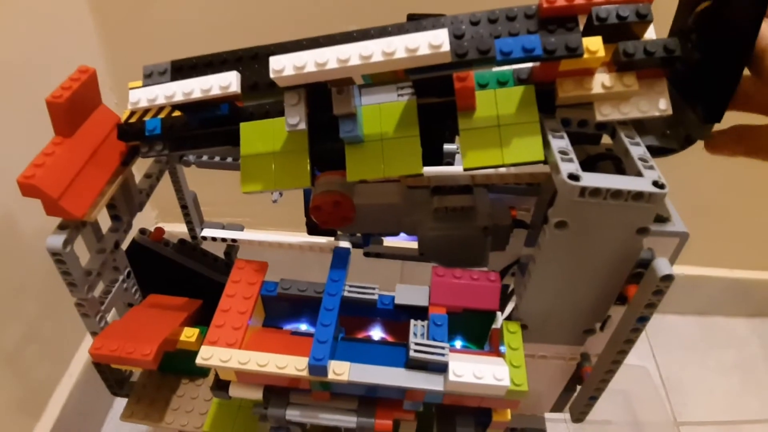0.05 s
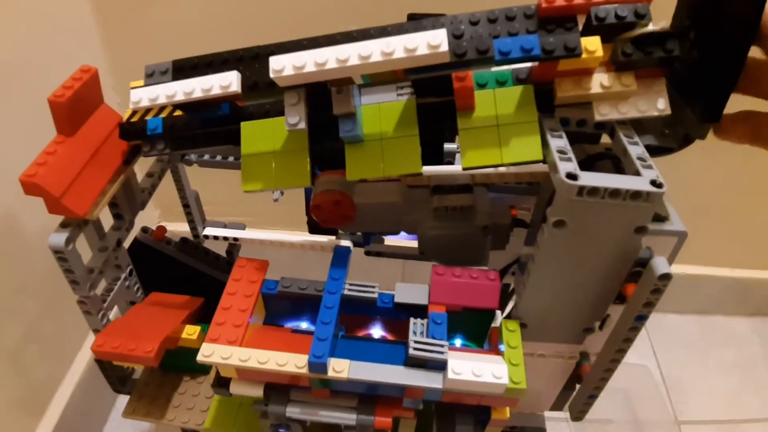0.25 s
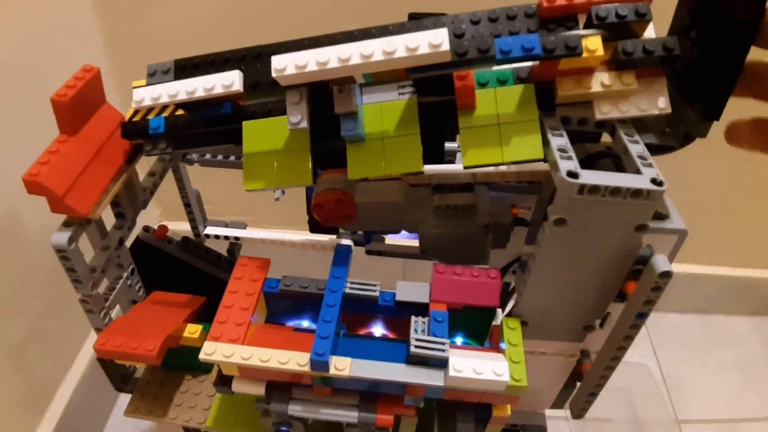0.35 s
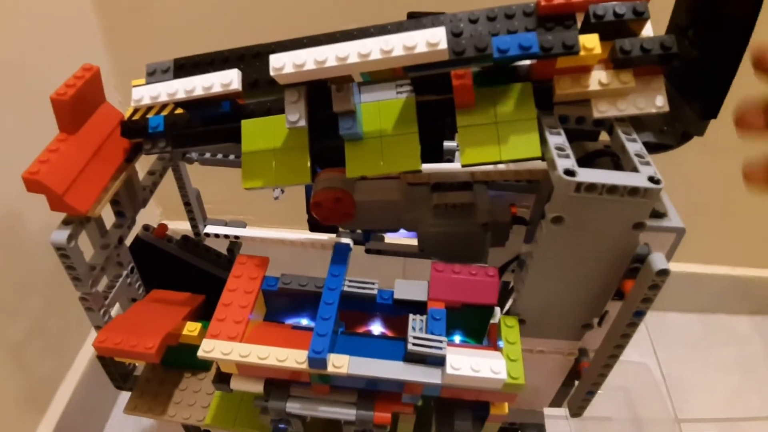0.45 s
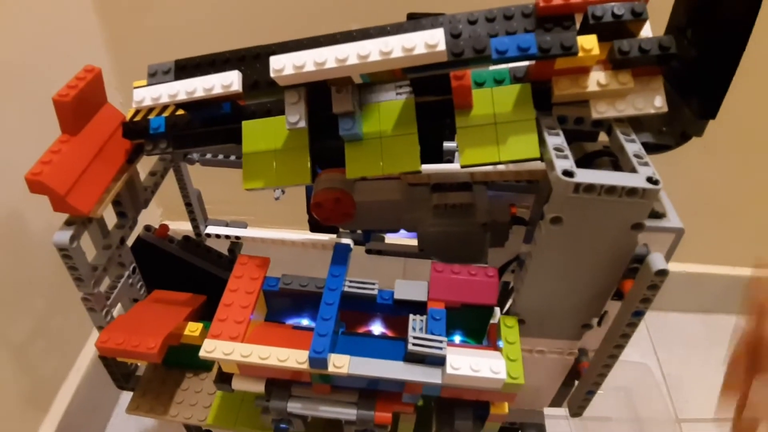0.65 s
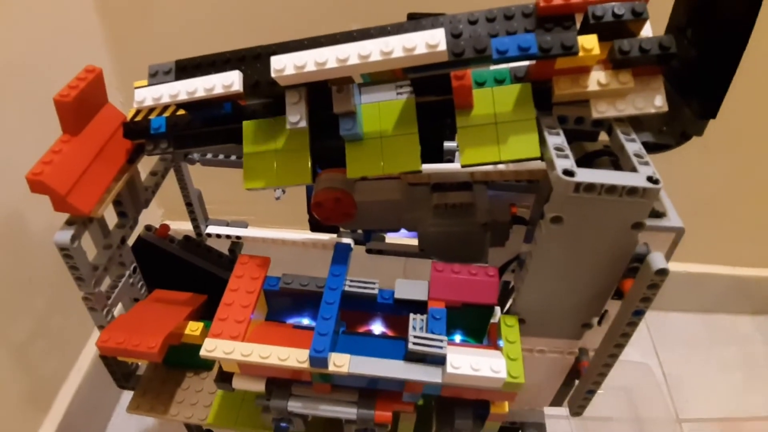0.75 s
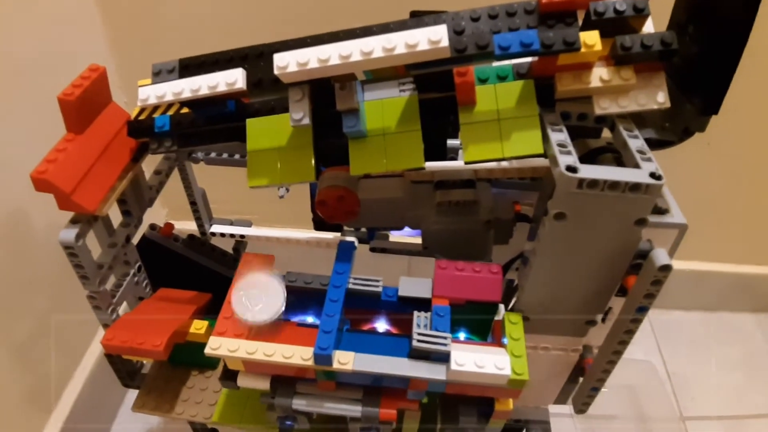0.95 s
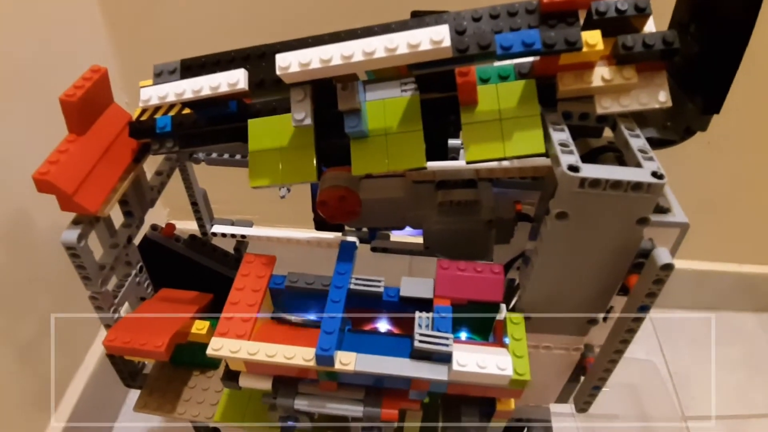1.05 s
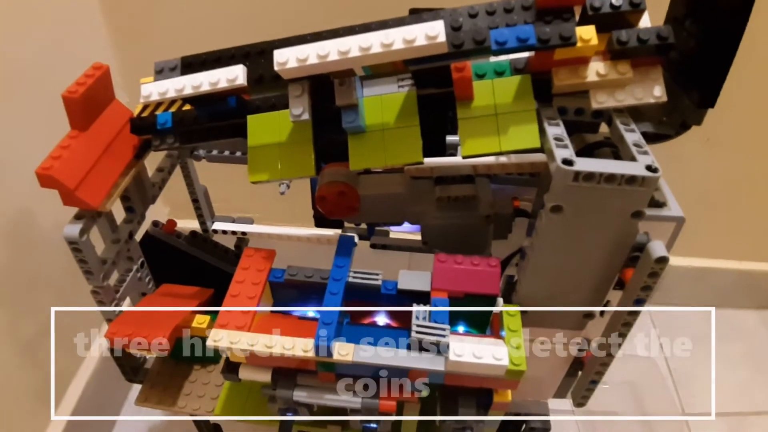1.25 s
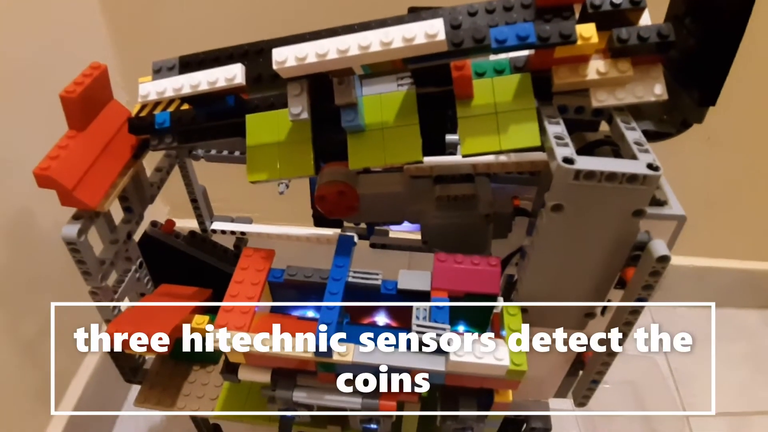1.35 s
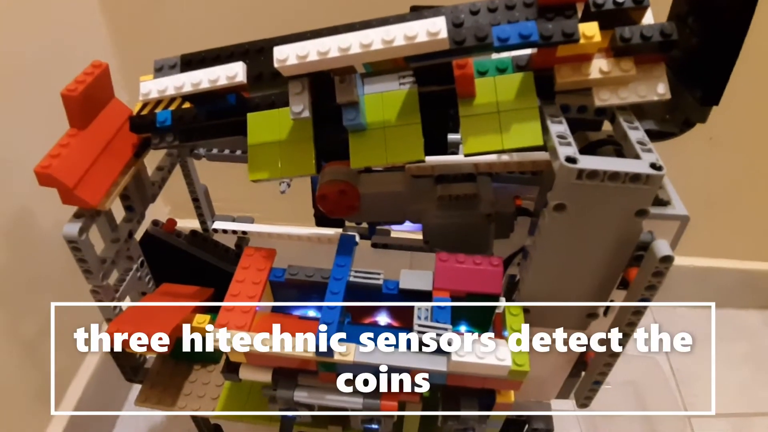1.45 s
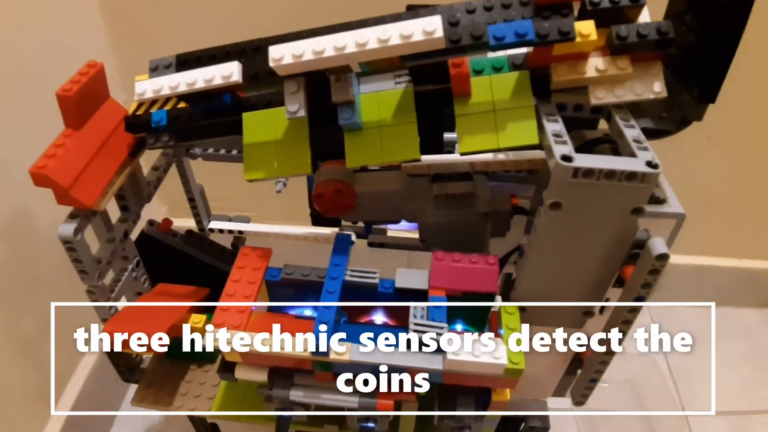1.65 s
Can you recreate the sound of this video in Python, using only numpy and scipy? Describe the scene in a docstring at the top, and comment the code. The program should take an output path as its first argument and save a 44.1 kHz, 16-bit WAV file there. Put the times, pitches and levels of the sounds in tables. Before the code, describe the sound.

Sharp clicks and scrapes of a coin tumbling through a sorting machine of plastic bricks.

```python
"""A coin clatters through a sorter built of plastic bricks, in a small hard room.
It drops onto a ramp, rolls and scrapes down it, knocks through a gate and lands in a tray.
Impacts excite damped modes of coin and plastic; friction makes a grinding noise and a thin squeal.
A loose part stirs as the coin enters; after the landing it rocks, rattling at every swing.
Rolling and rattling force the frame and the hollow chassis to vibrate, over a faint background noise."""
import sys
import numpy as np
from scipy import signal
from scipy.io import wavfile

SR = 44100
rng = np.random.default_rng(int(sys.argv[2]) if len(sys.argv) > 2 else 0)


def put_to_file(sound):
    """Save the sound as 16-bit audio at rate SR, in the file named by the first command-line argument."""
    columns = np.atleast_2d(sound).T  # one column per channel
    safe = np.clip(columns, -1, 1)
    whole_steps = np.round(safe * 32767)
    wavfile.write(sys.argv[1], SR, whole_steps.astype(np.int16))


N = 74970
T = np.arange(N) / SR

# Impacts of the coin on plastic: (time [s], level [dB], bass boost [dB], resonance of the piece [Hz],
# resonance boost [dB], T60 at 4 kHz [s], coin ring [dB], left minus right [dB])
IMPACTS = [(0.2159, -16, -20, 5430, 13, 0.041, 3, 3), (0.2226, -11, -8, 1460, 8.5, 0.054, -1, -3.5),
           (0.2356, -30, 0, 660, 27, 0.055, 25, -8), (0.2461, -8.5, -11, 5530, -9, 0.033, -1, 3),
           (.269, -24, -27, 5560, 14.5, 0.025, -6, -7), (0.4464, -11.5, -7.5, 6440, 6.5, 0.031, -6, 0),
           (0.6091, -12.5, -29, 3530, 3, 0.041, -1.5, 0.5), (.7795, -7, 3.5, 1270, 3.5, 0.042, -20, 2.5),
           (0.834, -14.5, -17, 4300, 1.5, 0.12, 11.5, 0), (0.864, -14.5, -35, 4320, 4.5, 0.092, -12, 0.5),
           (0.9494, -8, -13.5, 770, 16, 0.037, -1, -0.5), (0.9679, -17.5, 7.5, 4850, 3, 0.032, -12, -7.5),
           (0.9744, -8.5, -12, 4640, 6.5, 0.026, 0, 2.5), (1.067, -20, -14, 8700, 11.5, 0.078, 11.5, 1),
           (1.1386, -6, 8, 2180, -0.5, 0.041, -4, 1.5)]
# Light ticks: the first two as the coin is still handled before the drop, the rest as the rolling coin crosses
# seams between bricks: (time [s], level [dB])
TICKS = [(0.0589, -41), (0.0837, -39), (0.29, -19.5), (0.31, -34), (0.348, -30), (0.499, -24.5),
         (0.516, -26), (0.5483, -24), (.5855, -32), (0.656, -23), (0.6989, -23.5), (0.815, -19.5),
         (1.059, -20.5), (1.085, -24), (1.105, -22.5), (1.167, -22)]
def knocks():
    """Impact excitation: each contact starts a broadband decay and free modes. Gives (clacks, ringing)."""
    s, db, bass_db, piece_hz, piece_db, t60, coin_db, pan_db = np.transpose(IMPACTS)
    tick_s, tick_db = np.transpose(TICKS)
    age = T - s[:, None]
    loss = np.where(age >= 0, np.log(1000) * age / t60[:, None], 1e3)

    def envelope(hz):
        bass = 1 / (1 + (hz / 780) ** 2)
        resonance = np.exp(-.5 * (np.log2(hz / piece_hz) / .25) ** 2)
        gains = from_db(db + bass_db * bass + piece_db * resonance) * pan(pan_db)
        longer = (4000 / hz) ** .18  # low bands ring longer
        ticks = fade(clicks(tick_s, from_db(tick_db + bass)), t60=.042 * longer)
        return gains @ np.exp(-np.minimum(loss / longer, 20)) + ticks
    on_ramp = s < .3
    later = ~on_ramp
    ringing = ramp(s[on_ramp], db[on_ramp])
    ringing += coin(np.r_[s, tick_s], np.r_[db + coin_db, tick_db - 8])
    ringing += chassis_knock(s[later], (db + bass_db / 2)[later])
    return clacks(envelope) + cracks(s[later], db[later], pan_db[later]), ringing


# Spectrum of struck plastic: (frequency [Hz], spectral density [dB])
CLACK_SPECTRUM = [(40, -34), (130, -27), (300, -23.5), (500, -23.5), (800, -12.5), (1200, -2.5), (2500, 1),
                  (4500, 5), (7000, 1), (8700, -23.5), (11000, -9.5), (15500, -11.5)]
def clacks(envelope):
    """Modal overlap: the crowded modes of struck plastic merge into noise."""
    return band_noise(CLACK_SPECTRUM, envelope)


def cracks(s, db, pan_db):
    """Time-bandwidth reciprocity: a brief contact gives a broad, dry snap."""
    bursts = np.array([fade(clicks(s, gains), t60=.0039) for gains in from_db(db - 1) * pan(pan_db)])
    return bandpass(bursts * rng.standard_normal((2, N)), hz=(1400, 6300))


# Modes of the coin: (frequency [Hz], level [dB], T60 [s])
COIN_MODES = [(9080, -15, 0.21), (9180, -10.5, 0.26), (15475, -2.5, 0.086)]
COIN_PAN_DB = 8
def coin(s, db):
    """Plate vibration: a small, stiff metal disc rings at a few high frequencies."""
    return struck(s, db - 17.5, COIN_MODES) * pan(COIN_PAN_DB)


# Rolling and scraping: (start [s], duration [s], level [dB], treble boost [dB], squeal [dB], drone [dB])
SLIDING_CONTACTS = [(0.076, 0.13, -50, -16, -40, -19), (0.2065, 0.022, -24.5, 14, -24, -36),
                    (0.239, 0.1314, -33, -7, -37, -15), (0.375, 0.091, -39.5, 2.5, -23, 5),
                    (0.474, 0.12, -33.5, -5, -37, -3), (0.605, 0.11, -30, -7, -29, 7.5),
                    (0.709, 0.096, -37, 1.5, -23, -2), (0.835, 0.03, -25.5, 21, 7, -25),
                    (0.95, 0.1, -38, -5, -10, 11.5), (1.147, 0.078, -31, 7.5, -25, -10)]
# Spectrum of friction: (frequency [Hz], spectral density [dB])
FRICTION_SPECTRUM = [(60, -37), (500, -11), (1100, -1), (2500, 6), (5000, 7), (7000, -0.5), (8700, -22),
                     (11000, -11.5), (15500, -20)]
def slides():
    """Friction: the coin's edge grinds on plastic and pumps its highest mode. Gives (grind, squeal)."""
    s, length, db, treble_db, squeal_db, drone_db = np.transpose(SLIDING_CONTACTS)[:, :, None]
    edge_s, squeal_hz, squeal_t60 = .0065, 15475, .068
    gates = np.clip(np.minimum(T - s, s + length - T) / edge_s + .5, 0, 1)

    def level(extra_db):
        return np.sum(gates * from_db(db + extra_db), axis=0)
    rough = grain(spread_db=3.5)
    grind = band_noise(FRICTION_SPECTRUM, lambda hz: rough * level(treble_db / (1 + (7700 / hz) ** 6)))
    pumped = fade(level(squeal_db), squeal_t60) * np.log(1000) / (squeal_t60 * SR)
    squeal = pumped * np.sin(2 * np.pi * squeal_hz * T + .6 * wander() + [[0], [2]])
    return grind + chassis_drone(level(drone_db)), squeal * pan(COIN_PAN_DB)


# Modes of the ramp: (frequency [Hz], level [dB], T60 [s])
RAMP_MODES = [(618, -20.5, 0.19), (1463, -9, 0.15), (2634, -16.5, 0.63), (3480, -5.5, 0.34),
              (3505, -3, 0.2), (5370, -14, 0.36), (5523, -0.5, 0.22), (5615, 8.5, 0.064), (5620, -14, 0.32)]
def ramp(s, db):
    """Free vibration: the struck ramp rings on at its natural frequencies."""
    return struck(s, db - 9.5, RAMP_MODES) * pan(db=4)


# Modes of the tray: (frequency [Hz], level [dB], T60 [s])
TRAY_MODES = [(73.6, -22, 0.096), (148, -10.5, 0.031), (1044, -3.5, 0.28), (1442, -10.5, 0.37),
              (2120, 0.5, 0.15)]
LANDING_S = 1.139
def tray():
    """Impulse response: at the landing, the tray's low modes thump and its high ones ring."""
    return struck([LANDING_S], [-23.5], TRAY_MODES)


# Swings of the loose part: (peak time [s], level [dB], half width [s])
ROCKING_SWINGS = [(0.119, -51, 0.017), (0.169, -40.5, 0.013), (1.211, -22.5, 0.0083), (1.314, -28.5, 0.013),
                  (1.402, -27, 0.0081), (1.483, -32, 0.012), (1.559, -33, 0.014), (1.63, -29, 0.01),
                  (1.698, -31, 0.015)]
# Spectrum of its rattle: (frequency [Hz], spectral density [dB])
RATTLE_SPECTRUM = [(200, -40), (600, -21.5), (1100, 0.5), (2200, 3.5), (4500, 2), (6500, -5), (8700, -21),
                   (11000, -16), (15500, -25)]
def rocking():
    """Amplitude modulation: the loose part's rattle swells and fades with every swing."""
    s, db, width = np.transpose(ROCKING_SWINGS)[:, :, None]
    swell = np.sum(from_db(db) / (1 + ((T - s) / width) ** 2 / 2) ** 2, axis=0)
    swell += from_db(-54.5) * (T > LANDING_S)  # a faint rattle persists between swings
    drive = swell * grain(spread_db=1.5)
    rattle = band_noise(RATTLE_SPECTRUM, lambda hz: drive) * pan(db=.9)
    return rattle + chassis_drone(from_db(-10.5) * swell)


# Modes of the hollow chassis: (frequency [Hz], level [dB], T60 [s])
CHASSIS_MODES = [(294.7, -5.5, 0.26), (359.3, -11, 0.33), (426, -7, 0.24)]
def chassis_knock(s, db):
    """Transient response: blows set the low modes of the chassis ringing."""
    return struck(s, db - 34, CHASSIS_MODES)


def chassis_drone(level):
    """Forced vibration: rolling and rattling shake the same modes at random."""
    return from_db(-53) * resonate(level * rng.standard_normal(N), CHASSIS_MODES)


# Modes of the brick frame: (frequency [Hz], level [dB], T60 [s])
FRAME_MODES = [(1035, -13.5, 1), (1120, -7, 1), (1902, -3, 0.24), (2220, -6, 0.25), (2710, -5, 0.12)]
def frame(x):
    """Sympathetic resonance: the frame sings; its loose joints favour now one mode, now another."""
    drive = from_db(-46) * x.mean(axis=0)
    return sum(resonate(drive * grain(spread_db=4, per_s=12), [mode]) for mode in FRAME_MODES)


# Reverberation time of the room: (frequency [Hz], T60 [s])
REVERB_TIMES = [(150, 0.22), (1200, 0.36), (4000, 0.2), (12000, 0.21)]
def room(x):
    """Reverberation: a diffuse field follows after 6 ms and lasts longest in the midrange."""
    flat = [(30, 0), (16000, 0)]
    tail = band_noise(flat, lambda hz: (T > .006) * from_db(-60 * T / at_hz(REVERB_TIMES, hz)))
    tail /= np.sqrt(np.sum(tail ** 2, axis=1, keepdims=True))
    return from_db(-8.5) * signal.fftconvolve(x, tail, axes=1)[:, :N]


# Spectrum of the background: (frequency [Hz], spectral density [dB])
BACKGROUND_SPECTRUM = [(30, -14), (60, 9), (110, 14.5), (200, -8), (1000, 4), (4000, -3), (15500, -10)]
def background():
    """Stationary noise: a faint, even hiss and rumble."""
    return from_db(-71) * band_noise(BACKGROUND_SPECTRUM, lambda hz: 1)


# Likeness of the sound at the two ears: (frequency [Hz], correlation [1])
EAR_CORRELATION = [(100, 0.4), (300, 0.86), (1000, 0.44), (2500, 0.1), (10000, 0.044)]
def correlation(hz):
    """Interaural coherence: the ears agree most in the low midrange, least in the treble."""
    return np.clip(at_hz(EAR_CORRELATION, hz), -1, 1)


def struck(s, db, modes):
    """Damped free vibration: each blow adds energy to the modes and gives them a new phase."""
    energy, out = clicks(s, from_db(db) ** 2), 0
    for hz, mode_db, t60 in modes:
        phase = np.cumsum(clicks(s, rng.uniform(0, 2 * np.pi, len(s))))
        phase = phase + np.array([[0], [1]]) * np.arccos(correlation(hz))
        amplitude = from_db(mode_db) * np.sqrt(fade(energy, t60 / 2))
        out = out + amplitude * np.sin(2 * np.pi * hz * T + phase)
    return out


def resonate(x, modes):
    """Driven resonance: each mode filters the force and reaches each ear with its own phase."""
    out = 0
    for hz, db, t60 in modes:
        pole = from_db(-60 / (t60 * SR)) * np.exp(2j * np.pi * hz / SR)
        phase = np.array([[1], [-1]]) * np.arccos(correlation(hz)) / 2
        response = signal.lfilter([1], [1, -pole], x + 1e-18)
        out = out + from_db(db) * np.imag(response * np.exp(1j * phase))
    return out


def band_noise(spectrum, envelope):
    """Superposition: stereo noise bands, each shaped in time by envelope(hz)."""
    edges = np.r_[25, 55, 90, 150, 250, 400, 580, np.geomspace(780, 16500, 20)]
    centres = np.sqrt(edges[1:] * edges[:-1])
    gains = from_db(at_hz(spectrum, centres))
    gains /= np.sqrt(np.sum(gains ** 2 * np.diff(edges)) * 2 / SR)
    white, out = rng.standard_normal((2, 2, N)), 0
    for k, hz in enumerate(centres):
        mid, side = white[k % 2]
        alike = correlation(hz)
        stereo = np.sqrt((1 + alike) / 2) * mid + np.sqrt((1 - alike) / 2) * side * [[1], [-1]]
        out = out + gains[k] * bandpass(stereo * (envelope(hz) + 1e-12), edges[k:k + 2])
    return out


GRAINS_PER_S = 570
def grain(spread_db, per_s=GRAINS_PER_S):
    """Log-normal fluctuation: the uneven strength of tiny contacts, with rms 1."""
    strength = from_db(spread_db * wander(per_s))
    return strength / np.sqrt(np.mean(strength ** 2))


def wander(per_s=GRAINS_PER_S):
    """Random process: glides to a new value per_s times a second."""
    return np.interp(T * per_s, np.arange(N), np.clip(rng.standard_normal(N), -2, 2))


def clicks(s, gains):
    """Impulse train: one pulse at each given time."""
    return np.bincount((np.asarray(s) * SR).astype(int), gains, N)[:N]


def fade(x, t60):
    """Exponential decay: each impulse falls 60 dB in t60 seconds."""
    return signal.lfilter([1], [1, -from_db(-60 / (t60 * SR))], x + 1e-18)


def bandpass(x, hz):
    """Band limiting between two edge frequencies."""
    return signal.sosfilt(signal.butter(2, hz, "band", fs=SR, output="sos"), x)


def pan(db):
    """Interaural level difference as left and right gains."""
    return from_db(np.array([[.5], [-.5]]) * db)


def at_hz(points, hz):
    """Interpolation on a log-frequency axis."""
    frequencies, values = np.transpose(points)
    return np.interp(np.log(hz), np.log(frequencies), values)


def from_db(db):
    """Amplitude ratio of a level in decibels."""
    return 10 ** (np.asarray(db) / 20)


def scene():
    """Superposition: the sorter's direct sound, its reverberation and the background add."""
    grind, squeal = slides()
    clatter, ringing = knocks()
    rattle = grind + rocking()
    sorter = clatter + rattle + frame(rattle)
    return from_db(-5.5) * (sorter + room(sorter) + ringing + tray()) + squeal + background()


def record(dry):
    """Low-pass filtering: a steep cut above 15.8 kHz."""
    return signal.sosfilt(signal.ellip(10, .1, 80, 15800, fs=SR, output="sos"), dry)


dry = scene()
out = record(dry)
put_to_file(out)
```